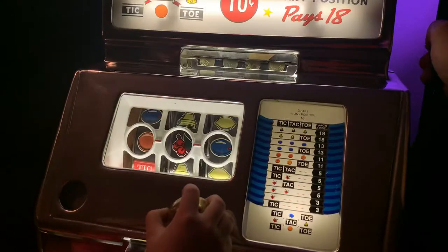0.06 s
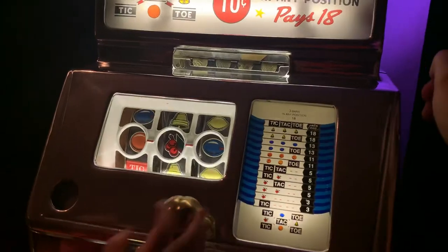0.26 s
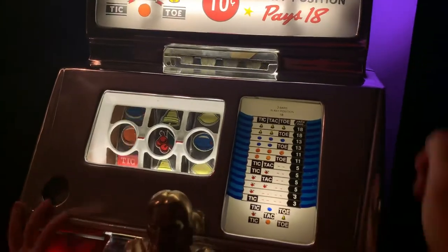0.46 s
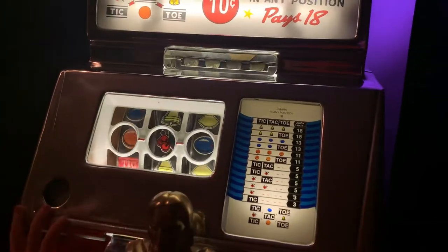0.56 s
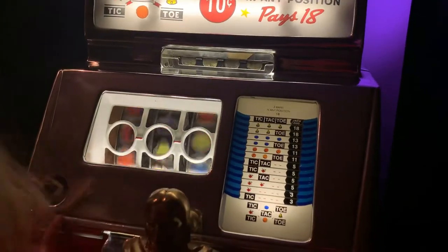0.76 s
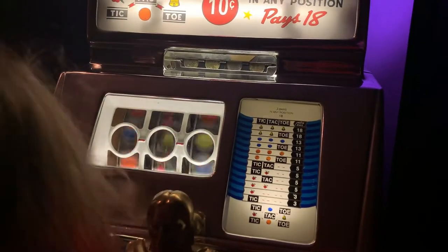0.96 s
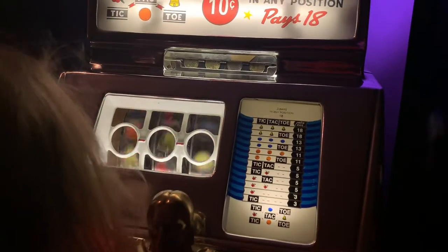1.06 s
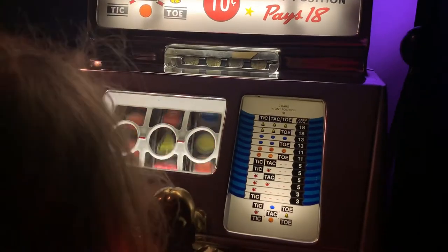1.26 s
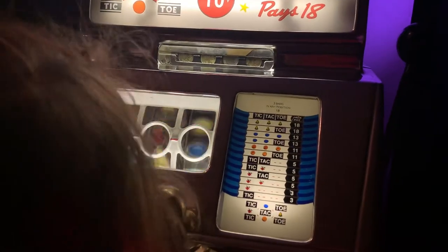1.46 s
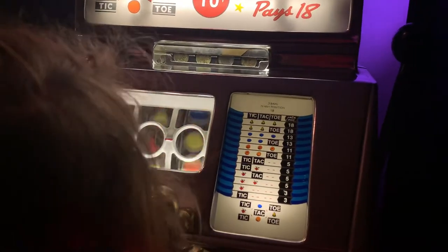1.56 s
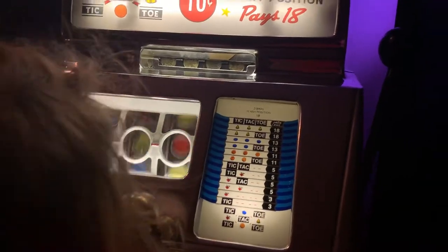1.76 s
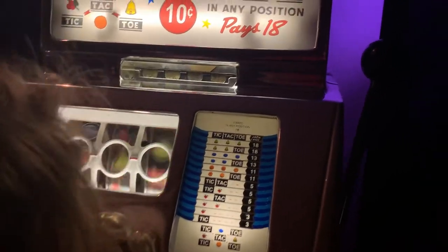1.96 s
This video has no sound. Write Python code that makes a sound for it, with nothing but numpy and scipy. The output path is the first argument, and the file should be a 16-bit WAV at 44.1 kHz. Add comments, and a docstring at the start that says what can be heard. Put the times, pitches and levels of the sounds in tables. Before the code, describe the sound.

Metal clacks and thumps from a mechanical slot machine, its reels whirring softly underneath.

```python
"""A quiet room, close to a mechanical slot machine whose lever is pulled.
Pawls and linkages clatter as the spring is cocked and trips; the lever swings home and a latch drops twice.
Each impact excites damped modes: the steel works ring, springs ping and the cabinet thumps.
Beneath them the spinning reels drive a low rumble and a whirr of friction."""
import sys
import numpy as np
from scipy import signal
from scipy.fft import rfft, irfft
from scipy.io import wavfile
from scipy.ndimage import uniform_filter1d

SR = 44100
rng = np.random.default_rng(int(sys.argv[2]) if len(sys.argv) > 2 else 0)


def file_out(sig):
    """Save sig as 16-bit WAV at sys.argv[1]."""
    # one column per channel
    cols = np.atleast_2d(sig).T
    # limit, then scale
    lim = np.clip(cols, -1, 1)
    pcm = np.round(lim * 32767).astype(np.int16)
    wavfile.write(sys.argv[1], SR, pcm)


N = 88200
TIME, FREQS = np.arange(N) / SR, np.fft.rfftfreq(2 * N, 1 / SR)
STRIKE_RISE_S, CASE_DECAY_S = 0.0027, 0.00065
BASS_ROOM_DB, BAND_EDGE_HZ = -3, 15950


def amp(db):
    """Amplitude ratio of a level in decibels."""
    return 10 ** (np.asarray(db) / 20)


def unit(x):
    """Normalisation to unit rms."""
    return x / np.sqrt(np.mean(x ** 2) + 1e-20)


def curve_at(points, hz):
    """Interpolation on a log-frequency axis."""
    f, value = np.transpose(points)
    return np.interp(np.log(hz + 1), np.log(f + 1), value)


def convolve(x, response):
    """Linear system: x convolved with an impulse response scaled to unit energy."""
    response = response / np.linalg.norm(response, axis=-1, keepdims=True)
    return irfft(rfft(x, 2 * N) * rfft(response, 2 * N))[..., :N]


def colour(x, spectrum):
    """Minimum-phase filter of the given spectral shape, rolling off beyond its ends."""
    skirts = (1 + (spectrum[0][0] / 2 / (FREQS + 1)) ** 2) * (1 + (FREQS / spectrum[-1][0] / 2) ** 4)
    cepstrum = irfft(np.log(amp(curve_at(spectrum, FREQS)) / skirts + 1e-5))
    causal = 2 * cepstrum[:N] * (TIME > 0)
    return convolve(x, irfft(np.exp(rfft(causal, 2 * N)))[:N])


def blow(start, rise, decay):
    """Impact envelope: linear rise, exponential decay."""
    t = np.maximum(TIME - start, 0)
    return np.minimum(t / rise, 1) * np.exp(-np.maximum(t - rise, 0) / decay)


def ring(modes, t60):
    """Modal superposition: an impulse response is a sum of damped sinusoids."""
    return sum(amp(db - 60 * TIME / t60) * np.sin(2 * np.pi * hz * TIME) for hz, db in modes)


# Running noise of the works and reels: t/s, rumble level/dB, whirr level/dB
RUNNING_LEVELS = [(0, -41, -63.5), (.12, -49.5, -51.5), (.3, -27, -38.5), (0.749, -35, -45.5),
                  (.9, -26.5, -47), (1.199, -31.5, -49), (1.45, -38.5, -69), (1.721, -38.5, -60.5),
                  (2, -42.5, -71.5)]
# Spectra of the cabinet's rumble and of the whirr: f/Hz, relative level/dB
RUMBLE_SPECTRUM = [(42, -14), (95, 4), (160, 6.5), (290, 1.5), (380, -13), (1000, -24)]
WHIRR_SPECTRUM = [(300, -8.5), (600, 2.5), (1800, -2.5), (3000, -1.5), (6000, -12.5)]
def reels(ticks_per_s=250):
    """Forced vibration: turning shafts rumble and drive the cabinet's modes; friction whirrs."""
    times, rumble_db, whirr_db = np.transpose(RUNNING_LEVELS)
    shafts = colour(rng.standard_normal(N), RUMBLE_SPECTRUM) / 2
    drone = amp(-7) * convolve(rng.standard_normal(N), cabinet_resonance())
    rumble = amp(np.interp(TIME, times, rumble_db)) * (shafts + drone)
    loose_hits = rng.random(N) * (rng.random(N) < ticks_per_s / SR)
    ticks = unit(convolve(loose_hits, np.exp(-TIME / CASE_DECAY_S)))
    rubbing = rng.standard_normal(N) * np.hypot(1, amp(-5) * ticks)
    whirr = amp(np.interp(TIME, times, whirr_db)) * colour(rubbing, WHIRR_SPECTRUM)
    return rumble + amp(BASS_ROOM_DB) * room(rumble) + (whirr + room(whirr)) / np.sqrt(2)


# Normal modes of the cabinet: f/Hz, relative level/dB
CABINET_MODES = [(95, 2.5), (146, -2), (172, -2.5), (291, -4)]
def cabinet_resonance():
    """Free vibration: the cabinet answers an impulse in its low modes."""
    return ring(CABINET_MODES, t60=0.25)


# Reverberation time of the room: f/Hz, T60/s
ROOM_T60 = [(80, 0.37), (1500, 0.58), (4000, 0.55), (15000, 0.133)]
def room(x):
    """Reverberation: absorption damps a diffuse field, the high treble fastest."""
    hz, t, field = signal.stft(diffuse_field(), SR, nperseg=256)
    decay = amp(-60 * t / curve_at(ROOM_T60, hz)[:, None])
    tail = signal.istft(field * decay, SR, nperseg=256)[1][:, :N]
    return convolve(x, tail * np.minimum(TIME / STRIKE_RISE_S, 1))


def diffuse_field(coherent_below_hz=510):
    """Spatial coherence: noise at two close microphones is alike in the bass, unrelated in the treble."""
    shared, apart = rng.standard_normal((2, N))
    apart = signal.sosfilt(signal.butter(1, coherent_below_hz, "high", fs=SR, output="sos"), apart)
    return np.array([shared + apart, shared - apart])


def contacts(spread_db=4):
    """Contact noise: many tiny collisions of uneven size, as noise with log-normal modulation."""
    noise = rng.standard_normal(N)
    sizes = np.repeat(rng.standard_normal(N // 12 + 1), 12)[:N]
    return unit(noise * amp(spread_db * np.clip(sizes, -2, 2)))


def scattered_contacts(share):
    """Distributed source: this share of the power is incoherent between the microphones."""
    separate = np.array([contacts(), contacts()])
    return np.sqrt(1 - share) * contacts() + np.sqrt(share) * separate


# Faint rattles of loose parts: t/s, level/dB
LOOSE_RATTLES = [(0.071, -56), (0.852, -37), (0.889, -42.5), (1.656, -44), (1.685, -48.5), (1.722, -50.5)]
# Metal impacts: t/s, housing knock level/dB, linkage clack level/dB, tick level/dB, chatter decay/s
IMPACTS = [(0.109, -67, -39, -24, 0.01), (0.133, -42, -41, -29.5, 0.013), (0.209, -23.5, -28, -30, 0.017),
           (0.249, -27, -36, -40, 0.017), (0.297, -46, -32, -22.5, 0.018), (0.348, -24.5, -36, -23, 0.0059),
           (0.366, -33.5, -35.5, -25, 0.085), (0.397, -42, -20.5, -11.5, 0.0045),
           (0.447, -25.5, -28, -22.5, 0.027), (.470, -32.5, -26, -18, 0.022),
           (0.488, -27.5, -21.5, -16, 0.024), (0.519, -33, -20, -24.5, 0.043),
           (0.548, -16.5, -14.5, -17.5, 0.0025), (0.552, -21.5, -16.5, -13.5, 0.021),
           (0.638, -35.5, -33, -27, 0.028), (0.659, -35, -22.5, -27.5, 0.018),
           (0.717, -52, -48.5, -30, 0.0092), (1.013, -24.5, -21, -31.5, 0.026),
           (1.041, -30.5, -28, -24.5, 0.047), (1.062, -23, -27, -47, 0.003),
           (1.093, -37, -21, -12.5, 0.0033), (1.098, -16.5, -23, -14.5, 0.017),
           (1.132, -25, -31, -27.5, 0.027), (1.153, -20, -36, -22, 0.0091),
           (1.182, -28.5, -33.5, -22.5, 0.0063), (1.506, -37.5, -23.5, -30, 0.011),
           (1.575, -46.5, -31.5, -29.5, 0.021), (1.589, -31, -31, -33, 0.017)]
# Spectra of an impact's three parts: f/Hz, relative level/dB
KNOCK_SPECTRUM = [(120, -40), (280, 6), (750, -4.5), (1150, -10.5), (2200, -25)]
CLACK_SPECTRUM = [(500, -8), (950, -7.5), (1450, -1.5), (2700, -3), (3600, -8), (9000, -34)]
TICK_SPECTRUM = [(1800, -26), (4200, 3.5), (5400, -7.5), (7000, 4.5), (8400, -5.5), (10800, 5), (13000, -1),
                 (15800, 2)]
# Normal modes of the steel works: f/Hz, relative level/dB
STEEL_MODES = [(428, 1), (558, 5.4), (1484, 0.35), (1887, 1.9)]
def linkage(pawl_share=.35):
    """Impact excitation: bursts of chatter, adding in power, ring the steel and echo in the case."""
    power = np.zeros((3, N))  # knock, clack, tick
    for start, db in LOOSE_RATTLES:
        power[:2] += (amp(db) * blow(start, rise=.014, decay=.014)) ** 2
    for start, *levels_db, decay in IMPACTS:
        power += (amp(levels_db)[:, None] * blow(start, STRIKE_RISE_S, decay)) ** 2
    knock_force = np.sqrt(power[0]) * scattered_contacts(share=.022)
    clack_force = np.sqrt(power[1]) * scattered_contacts(share=.22)
    tick_force = np.sqrt(power[2]) * scattered_contacts(share=.022)
    tick_force = np.sqrt(1 - pawl_share) * tick_force + np.sqrt(pawl_share) * pawls(IMPACTS)
    knock = colour(knock_force, KNOCK_SPECTRUM)
    clack = colour(clack_force, CLACK_SPECTRUM)
    tick = colour(tick_force, TICK_SPECTRUM)
    body = knock + clack + springs()
    steel = amp(-4.5) * convolve(clack_force, ring(STEEL_MODES, t60=0.12))
    case_echo = amp(0.5) * convolve(clack + tick / 2, diffuse_field() * np.exp(-TIME / CASE_DECAY_S))
    reverberation = room(amp(-16) * (body + steel) + amp(-24) * tick)
    return body + tick + steel + case_echo + reverberation


def pawls(impacts, mode_count=24, mean_t60_s=.035):
    """Natural frequencies: each small part that strikes rings briefly in modes of its own."""
    sound, chatter, t = np.zeros(N), contacts(), TIME[:N // 20]
    for start, _, _, tick_db, decay in impacts:
        offset, length = rng.random((2, mode_count, 1))
        hz = BAND_EDGE_HZ * (np.arange(mode_count)[:, None] + offset) / mode_count
        t60 = mean_t60_s * (length + .5)
        modes = np.sum(amp(-60 * t / t60) * np.sin(2 * np.pi * hz * t), axis=0)
        force = amp(tick_db) * blow(start, STRIKE_RISE_S, decay) * chatter
        sound += signal.oaconvolve(force, unit(modes))[:N] / np.sqrt(len(t))
    return sound


# Heavy parts landing on their stops: t/s, level/dB, panel f/Hz
PANEL_BLOWS = [(0.145, -28, 230), (.228, -23.5, 146.8), (0.262, -32, 105), (.357, -28, 147),
               (0.46, -21.5, 170), (.522, -17, 172.7), (0.55, -22.5, 118.6), (0.66, -24.5, 77.5),
               (1.036, -17.5, 164.5), (1.107, -19, 149), (1.532, -22, 95), (1.603, -22, 99),
               (1.729, -35.5, 95.7)]
def cabinet_thumps(rise_s=0.0031):
    """Transient response: the struck panel swings at its own pitch; the whole cabinet booms and thuds."""
    impulses, thud_power, panels = np.zeros((3, N))
    for start, db, hz in PANEL_BLOWS:
        impulses[round(start * SR)] += amp(db)
        thud_power += (amp(db) * blow(start, rise_s, decay=0.047)) ** 2
        panels += amp(db) * blow(start, rise_s, decay=.02) * np.sin(2 * np.pi * hz * (TIME - start))
    modes = cabinet_resonance() * np.minimum(TIME / rise_s, 1)
    boom = amp(-23.5) * signal.fftconvolve(impulses, modes)[:N]
    thud = amp(-6.5) * colour(np.sqrt(thud_power) * rng.standard_normal(N), RUMBLE_SPECTRUM)
    sound = panels + boom + thud
    return sound + amp(BASS_ROOM_DB) * room(sound)


# Pings of springs and levers: t/s, f/Hz, level/dB, decay/s
SPRING_PINGS = [(.303, 1696, -27, .012), (0.519, 1367, -15.5, 0.0044), (0.657, 1558, -15, 0.0047),
                (.73, 15520, -31, 0.042), (1.061, 1942, -12.5, 0.007)]
def springs():
    """Damped oscillators: springs and levers sing briefly, their frequency modulated as they rub."""
    sound = np.zeros(N)
    for start, hz, db, decay in SPRING_PINGS:
        wander = 0.015 * unit(uniform_filter1d(rng.standard_normal(N), size=100))
        phase = 2 * np.pi * np.cumsum(hz * (1 + wander)) / SR
        sound += amp(db) * blow(start, STRIKE_RISE_S, decay) * np.sin(phase)
    return sound


# Stereo balance: f/Hz, left minus right level/dB
LEVEL_DIFFERENCE = [(250, -1.86), (1300, 5.5), (2800, 4), (4200, -0.5), (15000, 1)]
def scene(left_lag_s=0.0001813, lag_from_hz=2000):
    """Time and level differences: treble reaches the right microphone first; the midrange leans left."""
    spectrum = rfft(linkage() + cabinet_thumps() + reels(), 2 * N)
    lean_db = curve_at(LEVEL_DIFFERENCE, FREQS) / 2
    lag = left_lag_s * np.minimum(FREQS / lag_from_hz, 1) ** 10
    left = amp(lean_db) * np.exp(-2j * np.pi * FREQS * lag)
    right = amp(-lean_db)
    return irfft(spectrum * np.array([left, right]))[:, :N]


def record(dry, low_cut_hz=54, ceiling=.85):
    """Band limiting and saturation: the deepest bass and top treble are lost, the peaks rounded off."""
    dry = signal.sosfilt(signal.butter(2, low_cut_hz, "high", fs=SR, output="sos"), dry)
    rounded = dry / (1 + (dry / ceiling) ** 6) ** (1 / 6)
    low_pass = signal.firwin(511, BAND_EDGE_HZ, window=("kaiser", 9), fs=SR)
    return signal.oaconvolve(rounded, low_pass[None], "same")


dry = scene()
out = record(dry)
file_out(out)
```